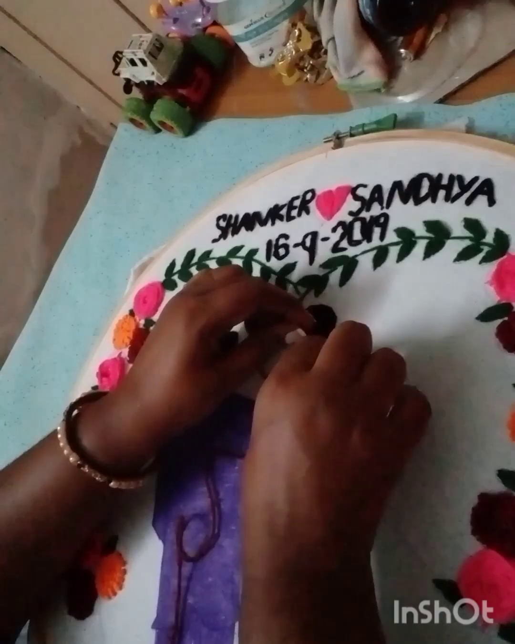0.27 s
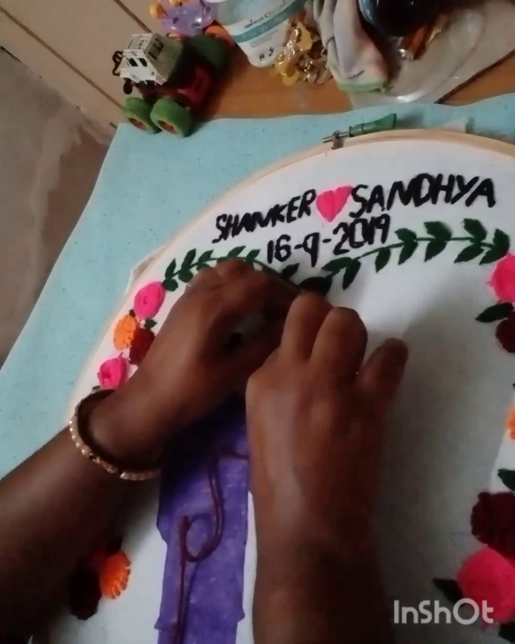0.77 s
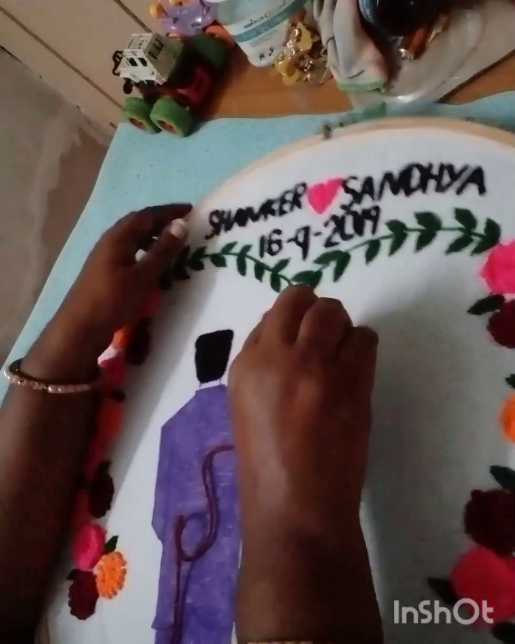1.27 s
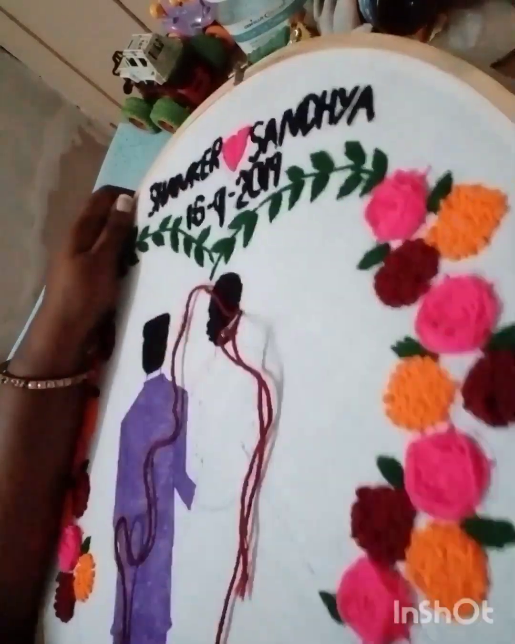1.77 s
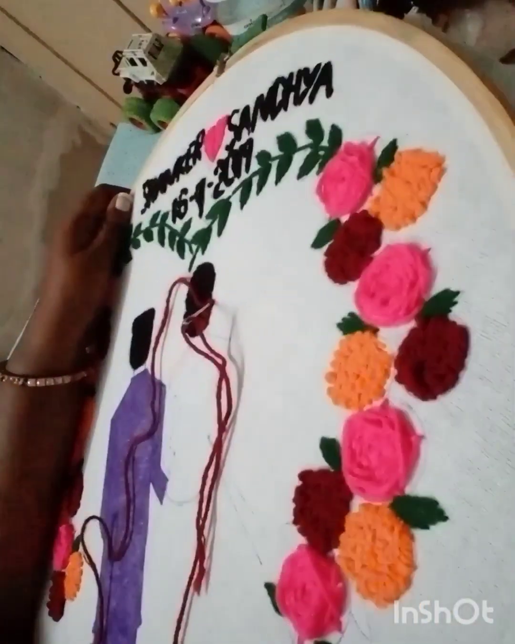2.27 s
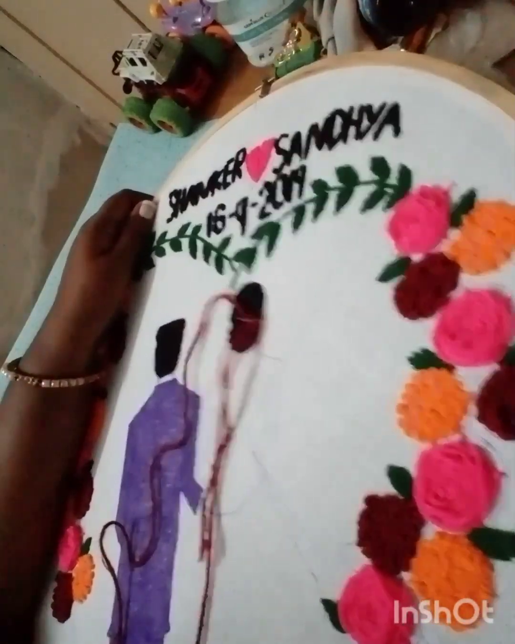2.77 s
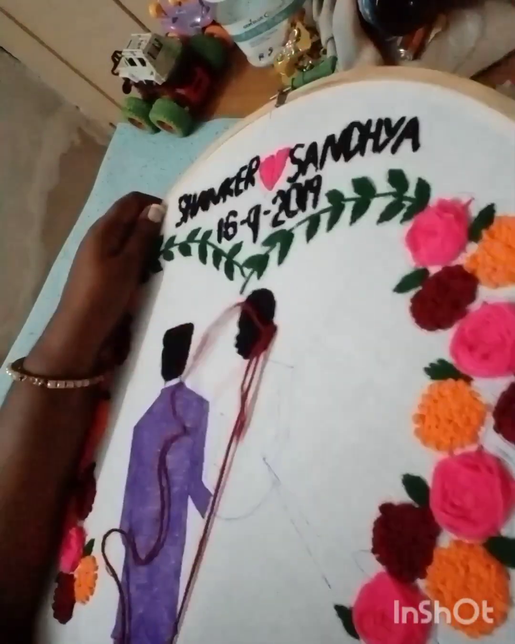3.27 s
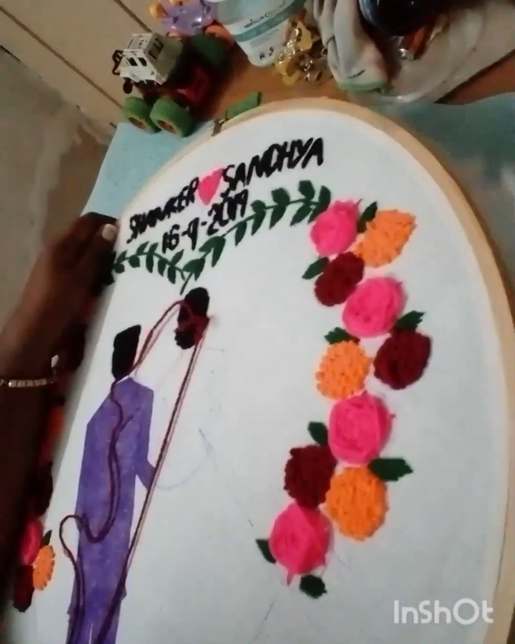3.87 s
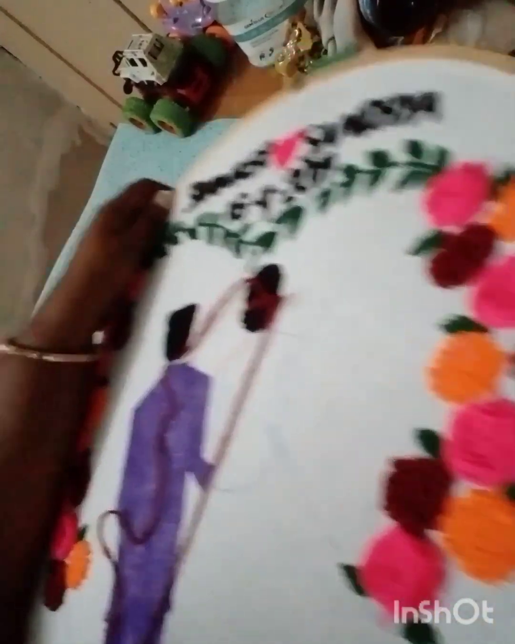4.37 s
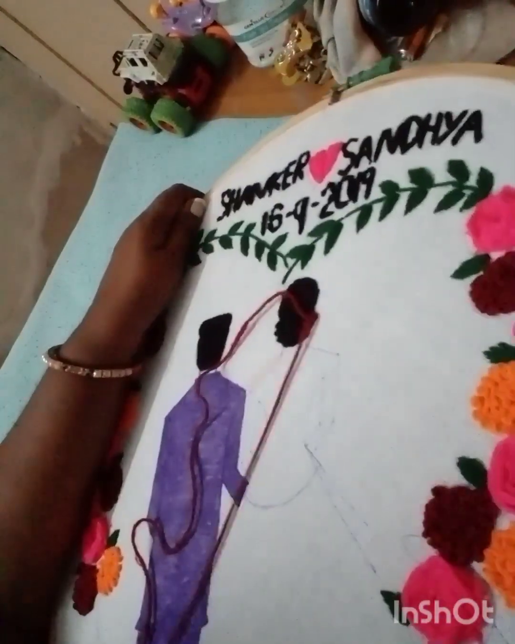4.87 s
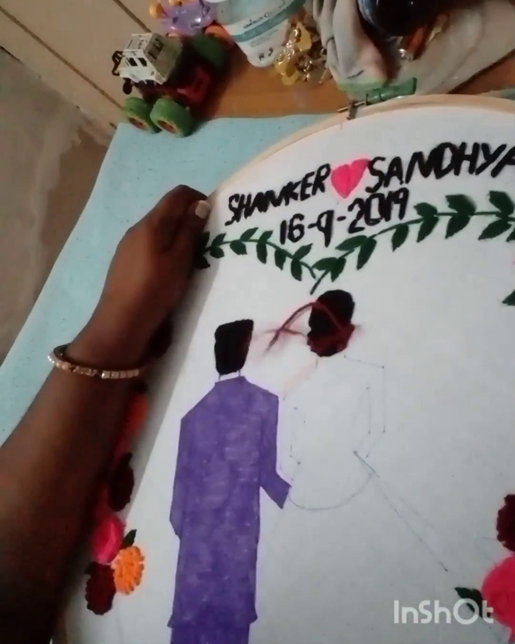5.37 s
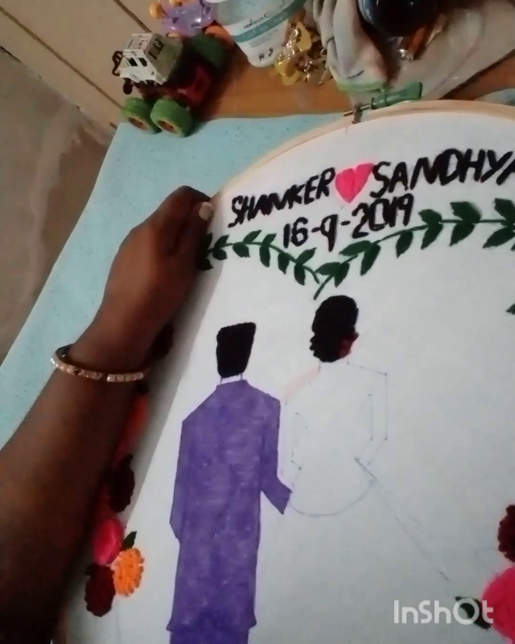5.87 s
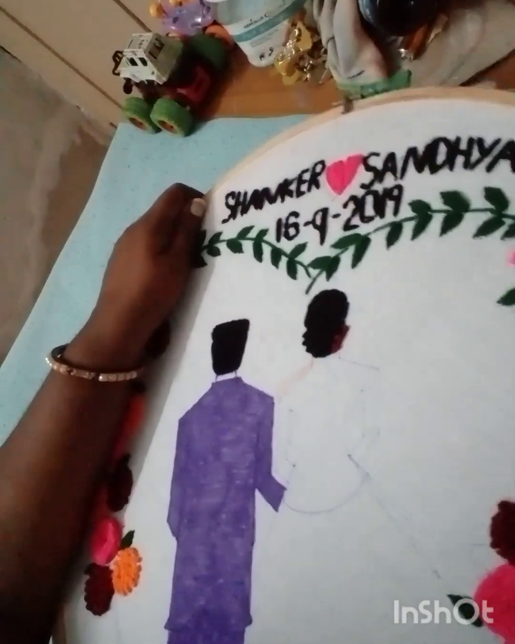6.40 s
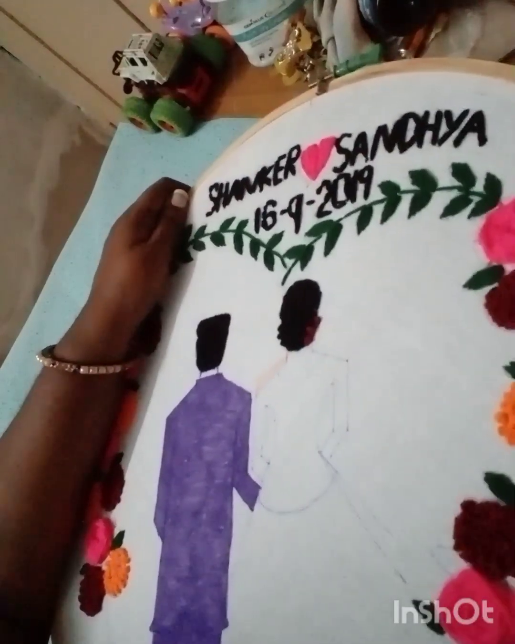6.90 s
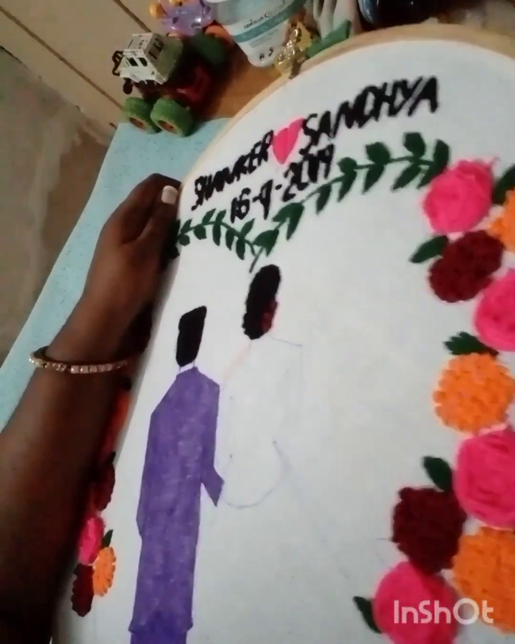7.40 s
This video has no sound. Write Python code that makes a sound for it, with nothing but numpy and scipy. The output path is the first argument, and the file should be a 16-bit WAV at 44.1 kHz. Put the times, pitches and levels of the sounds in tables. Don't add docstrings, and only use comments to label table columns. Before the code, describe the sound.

Close, essentially mono sound of hands working on a stretched cloth hoop over a table. Low handling rumble and dull cloth booms lie beneath dry fibre scratches and small crisp ticks. Two loud wooden clatters, at about two and five seconds, stand out sharply, with a much weaker knock after seven. Early on and mid-way, faint high chirps echo off walls outdoors. The room is dry, with a low noise floor.

```python
import sys
import numpy as np
from scipy import signal
from scipy.fft import rfft, irfft, next_fast_len
from scipy.io import wavfile

SR = 44100
rng = np.random.default_rng(int(sys.argv[2]) if len(sys.argv) > 2 else 0)


def wav_record(signal):
    frames = np.transpose(np.atleast_2d(signal))
    bounded = np.clip(frames, -1, 1)
    quanta = np.round(bounded * 32767).astype(np.int16)
    wavfile.write(sys.argv[1], SR, quanta)


def volts_from_db(level):
    exponent = np.asarray(level, float) / 20
    return 10 ** exponent


N = 336924

# (frequency [Hz], level [dB])
FLOOR_COLOUR = [(12, -56), (20, -9.5), (59, -8), (113, -3), (192, -12.5), (556, -17.5), (972, -32),
                (1560, -25.5), (2310, -33), (4040, -42), (4920, -31), (6150, -40.5), (12400, -25),
                (14600, -28), (15900, -28.5)]
FLOOR_DB = -67
SELF_NOISE_DB, SELF_NOISE_HZ = -79.5, 4820
TOP_HZ = 15800
ROOM_T60_S, ROOM_DB, WALL_CUT_HZ = 0.15, -9.5, 15000

# (time [s], peak [dB], pitch [Hz], t60 [s])
TABLE_THUDS = [(2.147, -32, 64, 0.26), (5.059, -24, 114, 0.1), (5.052, -30, 195, 0.14),
               (0.0, -57, 690, .25), (2.165, -33, 240, .2), (3.178, -44, 78, .25), (4.203, -49, 165, .2),
               (5.056, -30, 275, .2), (5.665, -57, 370, .4), (7.12, -46, 170, .3), (7.16, -42, 170, .2)]
# (time [s], peak [dB], pitch [Hz], t60 [s])
CLOTH_BOOMS = [(2.148, -31, 484, .1), (2.1785, -18, 560, .11), (2.156, -24, 720, 0.068),
               (2.184, -26, 780, .09), (2.149, -31, 1550, .05), (7.161, -35, 900, .06),
               (7.108, -43, 900, .06), (2.215, -33, 381, 0.14), (5.052, -27.5, 351, 0.16),
               (5.084, -31, 373, .1), (5.122, -35.5, 354, 0.16), (5.125, -37, 150, .1),
               (5.16, -41, 280, 0.18), (6.846, -42.5, 330, 0.16), (6.848, -46.5, 551, 0.12),
               (7.08, -49, 366, .06), (7.111, -36.5, 369.6, .15), (7.16, -29, 373.4, .06)]
THUD_RISE_S, BOOM_RISE_S = 0.0074, 0.0013

# (time [s], peak [dB], crack re peak [dB], favoured pitch [Hz], t60 [s])
HOOP_KNOCKS = [(2.126, -41, -16, 560, 0.039), (2.1462, -16, -12.5, 544, 0.17),
               (2.157, -44, -15, 606, 0.043), (2.1763, -22, -3.5, 560, 0.18), (2.1935, -35, -8, 360, 0.062),
               (2.202, -25, -27, 620, 0.078), (3.1613, -40, -14, 405, 0.15), (5.011, -32.5, 3, 815, 0.13),
               (5.0223, -28, -4, 536, 0.19), (5.0418, -25.5, -3, 765, 0.055), (5.0505, -20, 3, 740, 0.039),
               (5.057, -21, -17, 347, 0.1), (5.069, -30, -25, 280, 0.38), (5.083, -19, -33, 710, 0.059),
               (5.094, -22.5, -37, 335, 0.033), (7.044, -50, -25, 516, 0.16), (7.078, -46, -30, 400, 0.08),
               (7.106, -39, -12, 376, 0.2), (7.1603, -29, -8.5, 490, 0.038)]
# (time [s], peak [dB], crack re peak [dB], favoured pitch [Hz])
HOOP_NUDGES = [(0.012, -54.5, -16, 714), (0.842, -53, -22, 745), (2.51, -53.5, -17, 820),
               (3.219, -49.5, -8, 150), (3.9, -43.5, -24, 193), (4.201, -44, -13, 165),
               (4.535, -45.5, -27, 161), (4.7226, -47.5, -28, 298), (6.68, -58.5, -22, 900),
               (6.7, -58, -29, 1200), (6.846, -41, -9, 310), (7.51, -59, -20, 955)]
NUDGE_T60_S = 0.25
# (frequency [Hz], level [dB], share of t60 [ratio])
HOOP_MODES = [(62.3, 8.5, 2.1), (129.4, 4, 0.67), (164.8, -3.5, 1.47), (235.8, -5, 0.88),
              (280, -11.5, 1.16), (359, 1, 0.51), (511, -6.5, 0.2), (526, 2, 0.38), (556, 0, 0.25),
              (644.7, -6, 0.86), (733, -1.5, 0.42), (840, -5, 1.04), (955, -6, 0.75), (1024, -18, 0.41),
              (1165, -4, 0.42), (1286, -6, 0.46), (1640, -24, 0.57), (1785, -10, 0.36)]
# (frequency [Hz], density [dB per Hz])
CRACK_COLOUR = [(710, -34), (1200, -21), (2530, -4.5), (4100, -7), (5320, -14), (7190, -14.5),
                (15800, -36.5)]
# (frequency [Hz], density [dB per Hz])
RATTLE_COLOUR = [(700, -3), (1000, -9), (1600, -13.5), (2300, -27.5)]

# (time [s], hold [s], scratch [dB], fibre hiss [dB])
YARN_PULLS = [(.015, 0.038, -66.5, -77), (.78, .01, -73, -78), (.84, 0.15, -71.5, -71.5),
              (1.01, 0.055, -66, -79), (1.12, .005, -76, -80), (1.185, .02, -68, -77),
              (1.23, .05, -66, -76), (1.94, 0.026, -65.5, -76), (2.07, 0.082, -60.5, -66.5),
              (2.15, 0.095, -55.5, -55.5), (2.27, 0.062, -65, -62), (2.945, 0.037, -71, -90),
              (3.165, 0.05, -61, -65.5), (3.22, 0.015, -54, -60.5), (3.295, .015, -64, -80),
              (3.34, 0.035, -57, -57), (3.89, 0.0078, -51.5, -61), (4.19, 0.063, -56.5, -53),
              (4.2, 0.21, -61, -66), (4.83, 0.056, -56.5, -59), (4.9, 0.15, -59, -55.5),
              (5.04, 0.053, -51.5, -49), (5.1, 0.047, -55, -54.5), (5.15, 0.074, -63.5, -62),
              (5.25, 0.51, -68, -64), (6.875, 0.047, -69, -65), (7.1, 0.19, -65, -66),
              (7.515, 0.012, -74, -72)]
PULL_RISE_DB_PER_S, PULL_FALL_DB_PER_S = 655, 208
# (time [s], hold [s], scratch [dB], fibre hiss [dB])
FINGER_BRUSHES = [(.6, .06, -79, -79), (1.4, 0.067, -70.5, -71), (1.7, 0.016, -67, -66),
                  (2.51, 0.0055, -64, -59.5), (2.6, 0.069, -71.5, -82), (2.82, 0.052, -75.5, -72),
                  (3.53, 0.065, -65, -62), (3.79, 0.083, -63, -59), (3.88, 0.0024, -54, -58.5),
                  (4.5, 0.14, -69.5, -73.5), (5.85, 0.0061, -68, -66.5), (1.83, 0.033, -78, -72.5),
                  (2.0, 0.055, -80, -71), (6.0, .05, -83, -79), (6.52, 0.037, -77.5, -74.5),
                  (6.7, 0.075, -74.5, -69.5), (7.0, 0.076, -74, -71.5), (7.3, 0.12, -70.5, -65.5),
                  (7.62, .02, -74, -77)]
BRUSH_RISE_DB_PER_S, BRUSH_FALL_DB_PER_S = 79, 157
REST_SCRATCH_DB, REST_HISS_DB = -80, -81.5
# (time [s], hold [s], squeak [dB], scratch [dB])
TIGHT_DRAGS = [
    (3.22, 0.0072, -51, -46.5),
    (3.236, .012, -50.5, -46),
    (3.34, 0.025, -50.5, -50),
    (3.37, 0.011, -56, -52),
    (3.39, 0.028, -58.5, -50.5),
    (4.83, 0.02, -59, -62),
    (4.86, .025, -58.5, -62),
]
DRAG_RISE_DB_PER_S, DRAG_FALL_DB_PER_S = 900, 800
# (time [s], hold [s], level [dB])
HOLLOW_STIRS = [(.57, 0.16, -69), (.62, 0.045, -65), (.78, 0.037, -68.5), (.9, 0.07, -70.5),
                (1.05, 0.021, -68), (1.23, .035, -64), (4.33, 0.094, -68.5), (5.2, 0.2, -66),
                (5.45, 0.29, -67), (5.85, 0.015, -65), (5.9, .02, -71), (6.15, 0.048, -82),
                (6.68, 0.065, -74.5), (7.515, 0.051, -68)]
STIR_RISE_DB_PER_S, STIR_FALL_DB_PER_S = 302, 250
# (frequency [Hz], density [dB per Hz])
SCRATCH_COLOUR = [(600, 2), (900, -5.5), (1500, -1), (2500, -3.5), (3500, -2), (5500, -9), (7200, -10.5)]
# (frequency [Hz], width [Hz], level [dB])
SCRATCH_MODES = [(1650, 170, -4), (3400, 1100, -7)]
# (frequency [Hz], density [dB per Hz])
FIBRE_COLOUR = [(2350, -17), (4000, -6), (6230, -7.5), (7270, -1.5), (9750, -10.5), (10300, -8.5),
                (12100, -9), (15100, -15), (15800, -5.5)]
# (frequency [Hz], width [Hz], level [dB])
SQUEAK_MODES = [(1250, 250, -10), (1900, 400, 1), (2450, 300, 0)]
# (frequency [Hz], width [Hz], level [dB])
AIR_MODES = [(1540, 220, 0), (2120, 240, -6), (850, 300, -7)]

# (time [s], peak [dB], pitch [Hz], t60 [s])
WOOL_SCUFFS = [(0.849, -45, 1400, 0.039), (1.05, -43, 1700, 0.06), (1.1, -49, 3200, .06),
               (1.1, -45, 1650, 0.1), (1.934, -49, 1670, 0.12), (3.29, -31, 2360, 0.056),
               (3.3387, -37, 2500, 0.04), (3.214, -37, 1900, 0.091), (3.232, -39, 1900, 0.068),
               (3.236, -39, 2450, .1), (3.34, -37, 1940, 0.11), (3.348, -36, 2450, .07),
               (3.366, -33.5, 2530, 0.17), (4.2341, -34, 2660, 0.074), (4.8313, -45, 2380, 0.05),
               (0.017, -47.5, 6600, 0.046), (.845, -47, 6000, 0.082), (1.02, -50, 2850, 0.1),
               (1.241, -48, 4200, 0.11), (2.149, -24, 1480, 0.14), (2.19, -27.5, 1090, 0.19),
               (5.08, -27.5, 1200, .15), (6.68, -52, 1200, .15), (2.178, -27, 2100, 0.11),
               (3.8, -51, 10000, .15), (4.195, -33.5, 9500, 0.13), (2.192, -29, 6400, 0.014),
               (2.80, -52, 5100, 0.28), (5.865, -45.5, 1080, 0.12), (3.291, -35, 2960, .06),
               (3.291, -37, 1340, .04), (2.858, -48, 3800, 0.086), (2.858, -45.5, 7100, 0.076),
               (2.2, -53, 2800, .12), (7.118, -42.5, 2600, .08), (6.865, -53, 3700, .08),
               (7.521, -58, 1400, 0.14), (6.888, -49.5, 3300, 0.3), (6.872, -45, 7200, 0.074),
               (7.112, -43, 1300, 0.076), (7.1632, -29, 1380, 0.036), (7.505, -56, 1450, 0.092)]
# (time [s], peak [dB], pitch [Hz])
NEEDLE_TICKS = [(0.021, -54, 1230), (0.7714, -44.5, 1500), (0.773, -48, 4500), (7.078, -48, 4000),
                (7.105, -49, 4000), (0.925, -45, 1450), (1.1216, -40.5, 1510), (1.193, -45, 2100),
                (1.193, -48, 3200), (1.33, -48, 2900), (1.556, -46, 4850), (1.695, -37.5, 7150),
                (1.797, -44, 7020), (2.065, -52, 7200), (2.0675, -41, 3430), (2.5552, -50, 1230),
                (2.556, -42, 4000), (3.562, -42, 9000), (3.611, -42, 4200), (3.825, -40, 5500),
                (3.8325, -39, 6600), (3.833, -40, 1800), (3.853, -37, 3000), (4.372, -45, 7000),
                (4.762, -47, 7200), (2.8287, -44, 7260), (3.517, -41, 5340), (3.5934, -49, 4100),
                (3.7155, -43, 5000), (3.759, -34.5, 7010), (3.832, -30.5, 4600), (3.8736, -33, 2900),
                (3.899, -33, 2400), (4.162, -34, 7400), (4.1833, -27, 5000), (4.1918, -24, 8400),
                (4.3298, -40, 1450), (4.37, -54, 1560), (6.675, -62, 1250), (6.8462, -42, 1250),
                (7.32, -42, 7600), (7.5196, -57, 1440)]
TICK_T60_S, SCUFF_RISE_S = 0.012, 0.0019

# (time [s], hold [s], cloth drum [dB], rumble [dB])
HAND_PRESSES = [(.02, 0.097, -69, -66.5), (.67, 0.041, -73, -60), (.84, 0.26, -67, -64.5),
                (1.17, 0.27, -67, -59), (1.71, 0.013, -64.5, -63), (1.98, 0.18, -71, -64),
                (2.17, 0.093, -51, -50), (2.4, 0.21, -65, -65), (2.95, 0.086, -68.5, -66),
                (3.17, 0.027, -59.5, -53), (3.25, 0.2, -65, -63), (3.71, 0.0075, -64.5, -66),
                (3.87, 0.039, -58, -56), (4.2, 0.15, -62, -61.5), (4.53, 0.25, -68.5, -57),
                (4.83, 0.17, -64, -63.5), (5.06, 0.034, -44.5, -40.5), (5.24, 0.35, -63.5, -63),
                (5.67, 0.11, -62.5, -61), (6.19, 0.15, -77, -61.5), (6.65, 0.17, -67.5, -65),
                (6.86, 0.022, -54.5, -62), (6.905, 0.018, -57.5, -66), (7.12, 0.087, -56, -60),
                (7.35, 0.17, -68.5, -65)]
PRESS_RISE_DB_PER_S, PRESS_FALL_DB_PER_S = 403, 135
REST_DRUM_DB, REST_RUMBLE_DB = -71, -68
# (frequency [Hz], density [dB per Hz])
DRUM_COLOUR = [(88, -35), (150, -9.5), (275, 0), (306, 1), (360, 0), (448, -4.5), (556, -3.5),
               (1300, -15.5), (1690, -74), (2860, -120)]
# (frequency [Hz], density [dB per Hz])
RUMBLE_COLOUR = [(12, -23), (20, -20), (59, 7.5), (87, 3), (118, 2.5), (140, 0), (220, -10), (290, -30),
                 (480, -120)]

# (time [s], top pitch [Hz], length [s], level [dB], octave partial re level [dB])
HUSKY_CALLS = [
    (.095, 3330, 0.085, -68, -32),
    (2.88, 3380, 0.05, -78, -30),
    (5.81, 3400, 0.22, -78, -33),
]
# (time [s], top pitch [Hz], length [s], level [dB], octave partial re level [dB])
FAR_CHIRPS = [
    (.172, 4880, 0.12, -71.5, -10),
    (.545, 4864, 0.11, -68, -7),
    (.925, 4896, 0.09, -68.5, -7.5),
    (1.03, 4900, 0.15, -82, -15),
    (1.355, 4884, 0.096, -72, -11),
    (4.385, 4960, .12, -77.5, -25),
    (4.785, 4930, 0.049, -72.5, -13),
    (5.28, 4900, 0.079, -72.5, -1),
]
CALL_GLIDE = [(0, .95), (.4, .98), (.6, 1.015), (1, 1.02)]
CHIRP_GLIDE = [(0, .99), (.2, 1.0), (.55, .993), (.78, .965), (1, .925)]
YARD_T60_S, YARD_DB = 0.66, 6


def rms_one(x):
    return x / np.sqrt(np.mean(x ** 2) + 1e-30)


def shaped(x, spectrum):
    hz, db = np.transpose(spectrum)
    size = next_fast_len(len(x), real=True)
    octave = np.log2(np.fft.rfftfreq(size, 1 / SR) + 1)
    below = np.maximum(np.log2(hz[0]) - octave, 0)
    above = np.maximum(octave - np.log2(hz[-1]), 0)
    gain = volts_from_db(np.interp(octave, np.log2(hz), db) - 22 * (below + above))
    return rms_one(irfft(rfft(x, size) * gain, size)[:len(x)])


def drift(rate):
    r = np.exp(-2 * np.pi * rate / SR)
    slow = signal.lfilter([1], [1, -2 * r, r * r], rng.standard_normal(N + SR))
    return rms_one(slow[SR:])


def ring(x, hz, t60):
    r, w = volts_from_db(-60 / (t60 * SR)), 2 * np.pi * hz / SR
    return signal.lfilter([0, np.sin(w)], [1, -2 * r * np.cos(w), r * r], x + 1e-18)


def resonant(x, modes):
    total = 0
    for hz, width, db in modes:
        t60 = np.log(1000) / np.pi / width
        total = total + volts_from_db(db) * rms_one(ring(x, hz, t60))
    return rms_one(total)


def add(out, s, sound):
    i = round(s * SR)
    out[i:i + len(sound)] += sound[:N - i]


def gestures(rows, rise_db_per_s, fall_db_per_s, rest_db):
    t = np.arange(0, N + 64, 64)[:, None] / SR
    s, hold, *levels = np.transpose(rows)
    below = rise_db_per_s * np.maximum(s - t, 0) + fall_db_per_s * np.maximum(t - s - hold, 0)
    gains = []
    for db, rest in zip(levels, rest_db):
        gain = volts_from_db(np.maximum((db - below).max(axis=1), rest))
        gains.append(np.interp(np.arange(N) / SR, t[:, 0], gain))
    return gains


def fibres(per_s, spread_db, clump_db):
    sizes = volts_from_db(spread_db * np.minimum(rng.exponential(1, N), 5))
    signs = np.sign(rng.random(N) - 0.5)
    slips = rng.random(N) < per_s / SR
    return sizes * signs * slips * volts_from_db(clump_db * drift(17.0))


def room(x, t60):
    t = np.arange(SR // 2) / SR
    tail = rng.standard_normal(len(t)) * volts_from_db(-60 * t / t60) * (t > 0.004)
    tail = signal.sosfilt(signal.butter(1, WALL_CUT_HZ, fs=SR, output="sos"), tail)
    return signal.fftconvolve(x, tail / np.sqrt(np.sum(tail ** 2)))[:N]


def room_floor():
    return volts_from_db(FLOOR_DB) * shaped(rng.standard_normal(N), FLOOR_COLOUR)


def self_noise():
    high_pass = signal.butter(6, SELF_NOISE_HZ, "high", fs=SR, output="sos")
    hiss = signal.lfilter([1, 0.3], [1], rng.standard_normal(N))
    return volts_from_db(SELF_NOISE_DB) * signal.sosfilt(high_pass, hiss) * [[1], [-1]]


def thuds(rows, rise_s):
    out, t = np.zeros(N), np.arange(SR // 3) / SR
    for s, peak_db, hz, t60 in rows:
        swell = volts_from_db(peak_db - 60 * t / t60) * (1 - np.exp(-t / rise_s))
        add(out, s, swell * np.sin(2 * np.pi * hz * t))
    return out


def knocks():
    out, t = np.zeros(N), np.arange(SR // 3) / SR
    contacts = sorted([tuple(row) for row in HOOP_KNOCKS] + [(*row, NUDGE_T60_S) for row in HOOP_NUDGES])
    chance = rng.normal(0, 1, (len(contacts), len(HOOP_MODES)))
    push = t * np.exp(-t / 0.000055)
    for (s, peak_db, crack_db, centre_hz, t60), luck in zip(contacts, chance):
        modes = np.zeros(len(t))
        for k, (hz, db, share) in enumerate(HOOP_MODES):
            mode_db = db + 4.94 * luck[k] - 14.1 * np.abs(np.log2(hz / centre_hz))
            modes += (-1) ** k * volts_from_db(mode_db) * ring(push, hz, t60 * share)
        modes *= 1 - 0.8 * np.exp(-(t / 0.0028) ** 2)
        crack = shaped(rng.standard_normal(len(t)), CRACK_COLOUR)
        crack *= np.exp(-t / 0.0028) + 0.2 * np.exp(-t / 0.0075)
        snap = np.sin(2 * np.pi * 900 * t) * np.exp(-t / 0.0002) * 6.8
        rattle_db = -14.0 + 10.7 * np.log2(centre_hz / 600) - 90 * t / t60
        rattle = shaped(rng.standard_normal(len(t)), RATTLE_COLOUR) * volts_from_db(rattle_db)
        knock = modes / np.abs(modes).max() + rattle + volts_from_db(crack_db - 7.5) * (crack + snap)
        add(out, s, volts_from_db(peak_db) * knock)
    return out


def rubbing():
    rest_db, silent_db = [REST_SCRATCH_DB, REST_HISS_DB], [-120]
    pulls = gestures(YARN_PULLS, PULL_RISE_DB_PER_S, PULL_FALL_DB_PER_S, rest_db)
    brushes = gestures(FINGER_BRUSHES, BRUSH_RISE_DB_PER_S, BRUSH_FALL_DB_PER_S, rest_db)
    scratch_gain, hiss_gain = np.maximum(pulls, brushes)
    drag_gain, bite_gain = gestures(TIGHT_DRAGS, DRAG_RISE_DB_PER_S, DRAG_FALL_DB_PER_S, silent_db * 2)
    stir_gain, = gestures(HOLLOW_STIRS, STIR_RISE_DB_PER_S, STIR_FALL_DB_PER_S, silent_db)

    slips = shaped(fibres(9000, spread_db=2.0, clump_db=1.45), SCRATCH_COLOUR)
    scratch = rms_one(slips + volts_from_db(-29.0) * resonant(slips, SCRATCH_MODES))
    scratch *= 1 - 0.55 * np.clip(drag_gain / volts_from_db(-66), 0, 1)
    hiss = shaped(fibres(16000, spread_db=3.0, clump_db=2.0), FIBRE_COLOUR)
    catches = fibres(2500, spread_db=2.5, clump_db=2.0)
    drag = np.zeros(N)
    for mode in SQUEAK_MODES:
        drag += volts_from_db(mode[2]) * resonant(resonant(catches, [mode]), [mode])
    hollow = resonant(fibres(6000, spread_db=1.5, clump_db=2.5), AIR_MODES)
    rub = np.maximum(scratch_gain, bite_gain) * scratch + hiss_gain * hiss
    return rub + drag_gain * rms_one(drag) + stir_gain * hollow


def ticks():
    out, t = np.zeros(N), np.arange(SR // 10) / SR
    needle = [(*row, TICK_T60_S, 0) for row in NEEDLE_TICKS]
    wool = [(*row, SCUFF_RISE_S) for row in WOOL_SCUFFS]
    for s, peak_db, hz, t60, rise_s in needle + wool:
        burst = rng.standard_normal(len(t)) * volts_from_db(-60 * t / t60) * (1 - np.exp(-t / (rise_s + 1e-9)))
        burst[0] = 0 if rise_s else 2.8
        tone = ring(burst, hz, 9.8 / hz)
        broad = 0.13 * np.diff(burst, prepend=0) / 3
        add(out, s, volts_from_db(peak_db - 8.5) * (tone / np.abs(tone).max() + broad))
    return out


def handling():
    rest_db = [REST_DRUM_DB, REST_RUMBLE_DB]
    drum_gain, rumble_gain = gestures(HAND_PRESSES, PRESS_RISE_DB_PER_S, PRESS_FALL_DB_PER_S, rest_db)
    drum = shaped(fibres(2500, spread_db=1.5, clump_db=1.5), DRUM_COLOUR)
    rumble = shaped(rng.standard_normal(N), RUMBLE_COLOUR) * volts_from_db(0.66 * drift(11))
    return drum_gain * drum + rumble_gain * rumble


def whistles(calls, bend, rough):
    out, waver = np.zeros(N), drift(151)
    for s, hz, length, level_db, octave_db in calls:
        u = np.linspace(0, 1, round(length * SR))
        glide = np.interp(u, *np.transpose(bend))
        pitch = hz * glide * (1 + rough * waver[round(s * SR):][:len(u)])
        phase = 2 * np.pi * np.cumsum(pitch) / SR
        voice = np.sin(phase) + volts_from_db(octave_db) * np.sin(2 * phase)
        add(out, s, volts_from_db(level_db) * np.sin(np.pi * u) ** 0.71 * voice)
    return out


def outside():
    calls = whistles(HUSKY_CALLS, CALL_GLIDE, rough=0.06) + whistles(FAR_CHIRPS, CHIRP_GLIDE, rough=0.016)
    return calls + volts_from_db(YARD_DB) * room(calls, YARD_T60_S)


def scene():
    hits = thuds(TABLE_THUDS, THUD_RISE_S) + thuds(CLOTH_BOOMS, BOOM_RISE_S) + knocks() + ticks()
    echoes = volts_from_db(ROOM_DB) * room(hits, ROOM_T60_S)
    mono = room_floor() + hits + echoes + rubbing() + handling() + outside()
    return np.array([mono, mono])


def roll_off(x):
    return signal.sosfilt(signal.butter(12, 16410, fs=SR, output="sos"), x)


def record(dry):
    top_cut = signal.ellip(12, 0.3, 55, TOP_HZ, fs=SR, output="sos")
    mix = signal.sosfilt(top_cut, dry + self_noise())
    return roll_off(mix)


dry = scene()
out = record(dry)
wav_record(out)
```